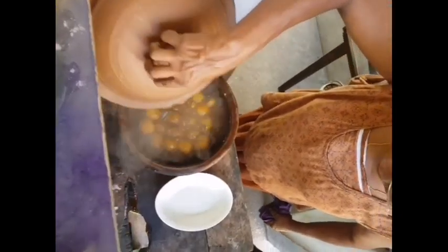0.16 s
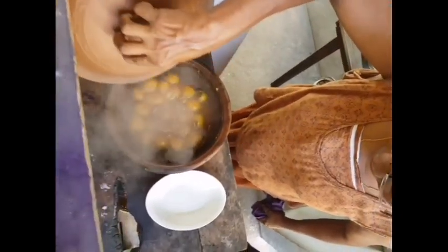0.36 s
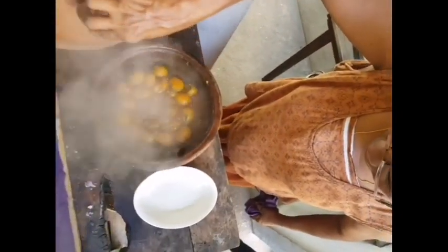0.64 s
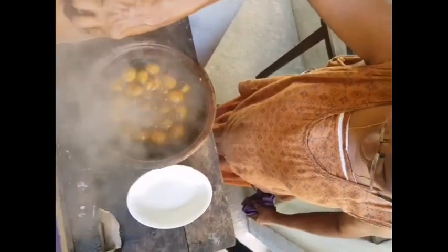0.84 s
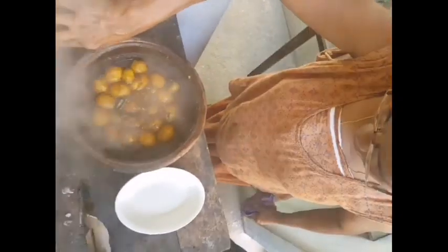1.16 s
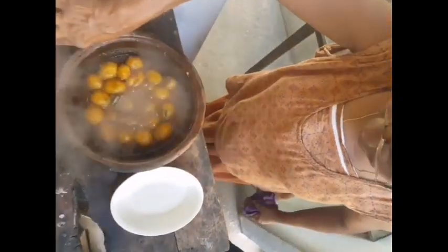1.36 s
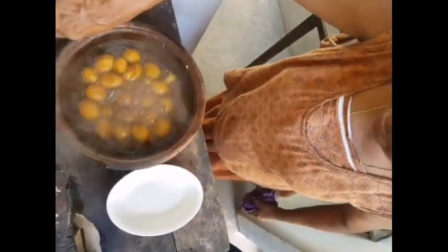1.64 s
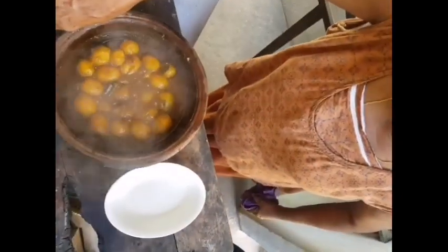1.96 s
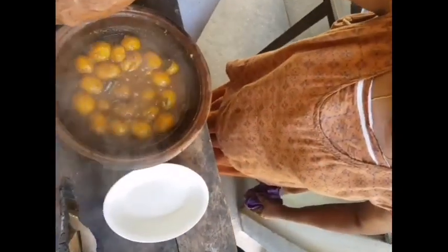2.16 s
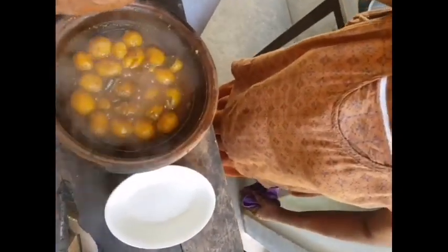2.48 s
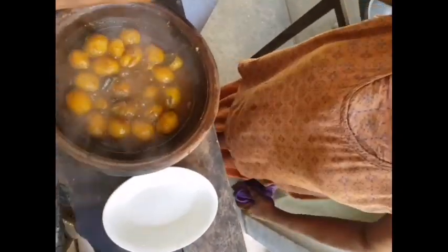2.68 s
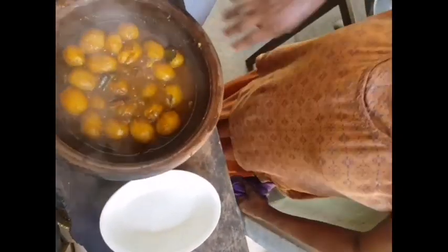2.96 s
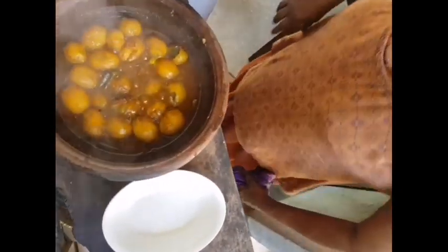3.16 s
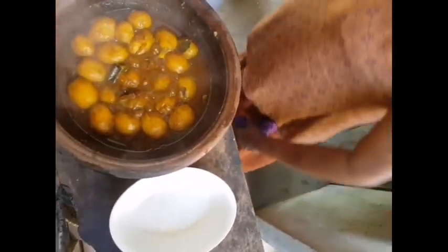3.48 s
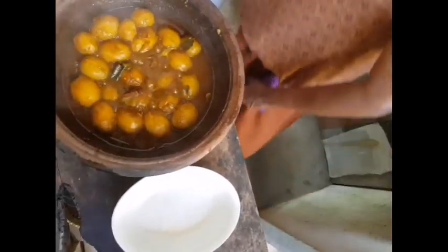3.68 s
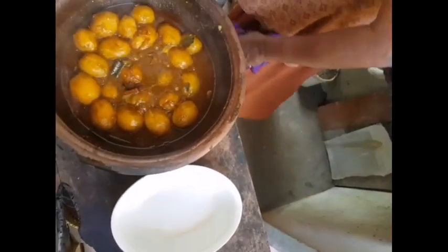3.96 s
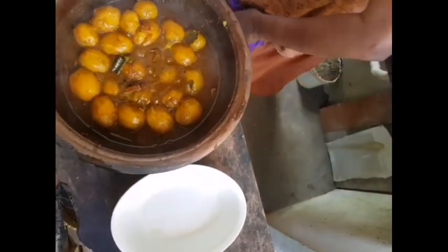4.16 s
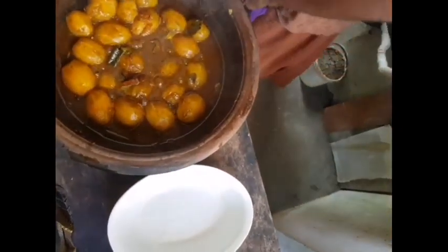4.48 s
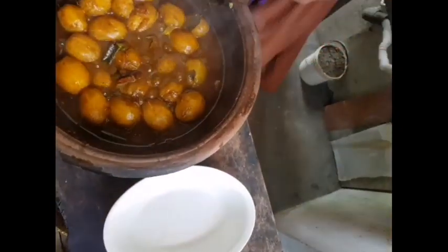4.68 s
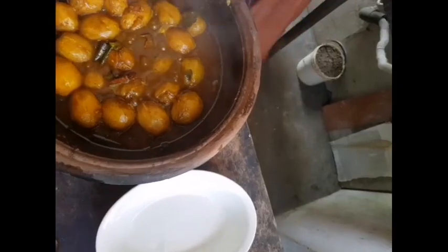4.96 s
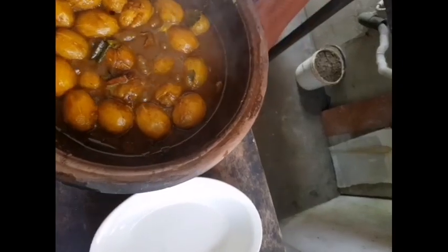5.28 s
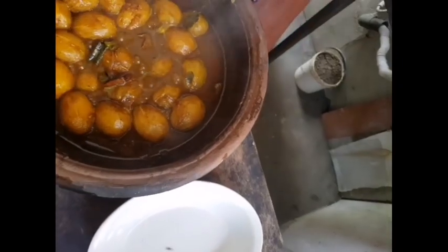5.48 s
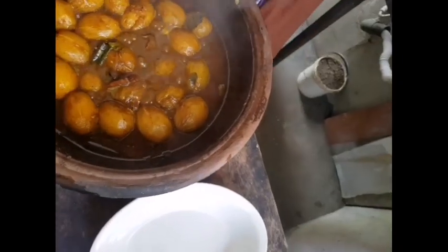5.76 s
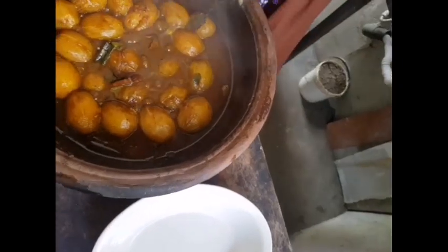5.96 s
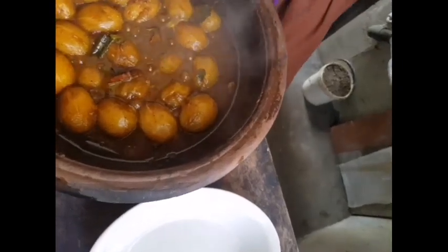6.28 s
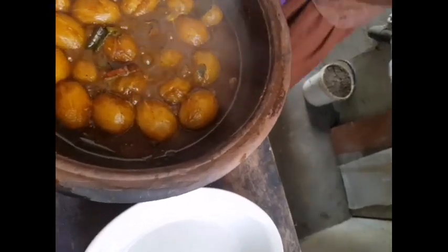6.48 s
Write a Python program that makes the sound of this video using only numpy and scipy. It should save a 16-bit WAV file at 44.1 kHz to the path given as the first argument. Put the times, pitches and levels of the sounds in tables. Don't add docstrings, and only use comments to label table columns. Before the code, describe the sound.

Close stereo in an open yard. After a quiet start with faint crackling and a fading vehicle, a clay lid bumps and scrapes on a wooden bench from about one second, ending in one loud hollow knock with a short ceramic ring. Then only soft cloth rustle, sauce spitting and bubbling toward the left, small ticks, and distant fowl, crows and a hoarse little bird over faint insects.

```python
import sys
import numpy as np
from scipy import signal
from scipy.fft import rfft, irfft
from scipy.io import wavfile
from scipy.ndimage import uniform_filter1d

SR = 44100
rng = np.random.default_rng(int(sys.argv[2]) if len(sys.argv) > 2 else 0)


def unload_wav(signal):
    wavfile.write(
        sys.argv[1],
        SR,
        np.round(np.clip(np.atleast_2d(signal).T, -1, 1) * 32767).astype(np.int16),
    )


def undo_db(level):
    steps = np.asarray(level, float) / 20
    return 10 ** steps


N = 291942

# (time [s], peak [dB], clay ring [dB], weight of the lowest modes [dB])
BUMPS = [(0.889, -23.5, -44, -28), (0.942, -24.5, -43, -32), (0.968, -26, -55, -17), (1.017, -29, -54, -30),
         (1.055, -28, -50.5, -40), (1.109, -30, -52, -32), (1.259, -27, -56, -21),
         (1.293, -12, -40.5, -10.5), (1.328, -21, -72, -12), (1.523, -21.5, -50, -4.5),
         (1.546, -23.5, -78, -13), (1.638, -22.5, -53, -4.5), (1.71, -33, -56, -1),
         (1.958, -24.5, -46, -11.5), (2.028, -21.5, -45, -15), (2.0969, -5.5, -61, -6),
         (2.0966, -29, -15.5, -10), (2.104, -31, -44, -2), (2.115, -19, -35, -17), (2.333, -28, -75, -12),
         (4.338, -56, -52, -14), (5.651, -58, -51, -4)]
# (time [s], peak [dB])
PUSHES = [
    (0.8914, -32),
    (0.9449, -27),
    (0.971, -35.5),
    (1.2984, -14),
    (1.306, -15.5),
    (1.526, -34),
    (2.0966, -10),
    (2.1062, -13),
    (2.1151, -12),
]
# (start [s], length [s], clay grind [dB], bench rumble [dB])
DRAG = [
    (0.89, 0.44, -41, -41),
    (1.382, 0.16, -45.5, -36),
    (1.572, 0.061, -46, -40),
    (1.638, 0.14, -57, -48),
    (1.864, 0.224, -42.5, -27.5),
    (2.195, 0.19, -57, -42),
    (2.362, 0.15, -79, -51.5),
]
# (frequency [Hz], level [dB], t60 [s])
BENCH_MODES = [(83, -22, 0.75), (99.7, 2.5, 0.089), (166, -1.5, 0.041), (194.6, -3.5, 0.42),
               (210, 3.5, 0.043), (233.4, 3, 0.097), (273.3, 1, 0.16), (315.2, -9, 0.23), (350.5, -3, 0.18),
               (401, -8, 0.12), (505, -21, 0.067), (595.4, -12.5, 0.17)]
# (frequency [Hz], level [dB], t60 [s])
CLAY_MODES = [(520, -22, 0.17), (640, -28, 0.13), (710, -17, 0.15), (824, -18, 0.36), (900, -17, 0.34),
              (1060, -31, 0.28), (1130, -5, 0.12), (1261, 2.5, 0.057), (1300, -11, .25), (1480, -16, 0.11),
              (1523, -4, 0.15), (1620, -8, 0.21), (1900, -6, 0.124), (2410, -17, 0.15), (2520, -11, 0.13),
              (2760, -17, 0.07), (3050, -19, 0.078)]
# (frequency [Hz], width [Hz], level [dB])
RIM_MODES = [(1027, 20, -4), (1300, 55, -11), (1493, 100, 5.5), (1687, 20, -2.5), (1940, 53, -19),
             (2340, 17, 4), (2494, 43, -3), (3740, 55, -11), (3050, 27, -0.5), (3820, 40, 1),
             (4220, 95, -8.5)]
# (time [s], tilt [dB per octave])
GRIND_TILT = [(0.85, 2), (1.1, -3), (1.3, 0), (1.8, -1.5), (2.1, 12), (2.3, -9)]

# (peak time [s], peak [dB], rise [s], fall [s])
RUSTLE_MOVES = [(.07, -68.5, 0.017, 0.58), (.55, -61.5, 0.13, 0.19), (.74, -59, 0.1, 0.073),
                (1.01, -57, 0.18, 1), (1.27, -50, 0.2, 0.14), (1.55, -53.5, 0.18, 0.054),
                (1.788, -48.5, 0.31, 0.1), (1.95, -47, 0.092, 0.37), (2.031, -36.5, 0.029, 0.14),
                (2.079, -43, 0.068, 0.02), (2.358, -51.5, 0.049, 0.042), (2.51, -53.5, 0.18, 0.098),
                (2.879, -55.5, 0.02, 0.15), (3.41, -58, 0.1, 0.26), (3.6, -59.5, 0.12, 0.075),
                (3.909, -62, 0.044, 0.16), (4.07, -54, 0.017, 0.15), (4.35, -47.5, 0.03, 0.065),
                (4.38, -54.5, 0.015, 0.72), (4.53, -58, 0.8, 0.067), (4.755, -64, 0.018, 0.025),
                (5.38, -63.5, 0.034, 0.13), (5.53, -56.5, 0.049, 0.093), (5.84, -63, 0.21, 0.15),
                (6.03, -62.5, 0.13, 0.15), (6.19, -57.5, 0.022, 0.065), (6.32, -56, 0.0052, 0.087),
                (6.401, -53, 0.026, 0.079), (6.44, -68, .02, 0.066), (6.58, -53, 0.025, 0.072)]
# (frequency [Hz], density [dB per Hz])
RUSTLE_TONE = [(900, -27), (1800, -3), (2900, 0.5), (4600, 5.5), (7000, -3.5), (8800, -6.5), (11000, -1.5),
               (14000, -8), (16000, -17.5)]
# (time [s], level [dB])
WEIGHT = [(0, 3.5), (.5, -5), (.86, -4.5), (1.0, 2), (1.6, 3), (1.78, -7.5), (1.9, 2.5), (2.1, 7.5),
          (2.5, -1.5), (3.9, 1.5), (4.4, 1.5), (5.3, -2), (5.65, 2.5), (6.2, -6), (6.4, 0), (6.62, 2.5)]

# (time [s], peak [dB], pitch [Hz], t60 [s], left over right [dB])
TICKS = [
    (4.095, -40, 2140, 0.014, 5),
    (3.194, -39, 980, 0.023, 9),
    (4.3453, -39.5, 4560, 0.12, -10),
    (5.528, -64, 2860, 0.026, 6),
    (5.833, -44.5, 8800, 0.014, 10),
    (6.392, -43, 10100, 0.014, 15),
    (6.562, -33, 2340, 0.027, 9),
    (6.572, -44.5, 2606, 0.045, 11),
]
# (time [s], peak [dB], centre [Hz], t60 [s])
CRACKS = [(1.297, -32.5, 2926, 0.12), (5.52, -59, 1900, 0.45), (5.545, -54.5, 1470, .25),
          (5.549, -57, 2750, .2), (5.168, -59, 990, .08), (5.407, -56, 1000, .08),
          (5.435, -55.5, 1040, 0.07), (6.39, -46, 14500, .15), (2.49, -49, 12500, .3),
          (3.108, -58, 1200, 0.051), (3.59, -49, 1500, 0.064), (5.655, -49, 3700, 0.24),
          (6.4, -58, 1300, 0.11)]

# (time [s], peak [dB], left over right [dB])
SPITS = [(0.1381, -44, 5.0), (0.5432, -42, -1), (0.7018, -42.5, 6), (0.7297, -42, 2.5), (0.84, -45.5, 10),
         (0.8934, -41, 5.5), (0.9448, -46, 3.5), (1.1817, -49, -1), (1.418, -44.5, 8), (1.5355, -40.5, 8),
         (1.677, -39.5, 11), (1.903, -40, 9), (1.948, -40, 6.0), (2.0313, -28.5, 10), (2.2089, -55, 6),
         (2.3436, -48, 12), (2.7576, -51, 4.0), (2.768, -47, 6), (2.8688, -52, 8), (3.0897, -47, 6.0),
         (3.2171, -50, 2.0), (3.23, -45, 5.0), (3.2894, -51, 7.5), (3.4695, -46, 10), (3.639, -48, 7),
         (3.688, -46, 4.5), (3.7796, -66, 3.5), (3.8908, -48, 8), (4.0682, -51, 5.0), (4.1894, -50, 6.0),
         (4.3455, -45, 2.5), (4.5156, -54, 4.0), (4.75, -47, 13), (4.8479, -53, 9), (4.916, -46, 12),
         (5.0419, -62, 8.0), (5.0415, -49, 9.5), (5.0557, -45.5, 9), (5.1313, -51, 11), (5.164, -47, 13),
         (5.237, -50, 7), (5.2759, -46, 13), (5.3373, -58, 8.0), (5.3742, -45.5, 19), (5.4774, -51, 10),
         (5.5308, -45, 5.5), (5.5867, -50, 3.0), (5.7074, -51, 7.0), (5.7726, -49, 12), (5.831, -37.5, 13),
         (5.9104, -47, 13), (5.9539, -48, 11), (6.017, -38, 13.5), (6.097, -51, 3.5), (6.1865, -47, 17),
         (6.3213, -45, 5), (6.392, -35.5, 14), (6.4923, -50.5, 10), (6.558, -62, 10), (6.572, -37, 9)]
# (time [s], peak [dB], pitch [Hz])
BUBBLES = [(3.579, -54, 695), (3.611, -50, 640), (4.236, -59, 1143), (4.284, -60, 567), (4.402, -48, 620),
           (4.452, -50, 440), (4.592, -51, 1050), (4.628, -50.5, 1100), (4.689, -64, 1340),
           (5.049, -53, 540), (5.17, -49, 910), (5.188, -68, 930), (5.418, -51, 600), (5.444, -64, 570),
           (5.662, -46, 725)]

# (time [s], pitch [Hz], level [dB])
FOWL = [
    [(2.42, 551, -58.5), (2.49, 665, -49), (2.54, 697, -42.5), (2.575, 682.5, -47.5), (2.63, 690.8, -45.5),
     (2.68, 692.3, -45), (2.73, 689, -67), (2.8, 703, -56)],
    [(3.0, 566, -52), (3.04, 588.3, -61), (3.06, 674.4, -52), (3.09, 683, -53.5), (3.116, 664.5, -45),
     (3.19, 656.4, -45), (3.25, 662, -57), (3.4, 652, -65.5), (3.78, 652.3, -64)],
    [(5.88, 549.7, -71), (5.91, 619, -53.5), (5.945, 640, -53), (5.965, 668.6, -45.5), (6.04, 650.2, -47.5),
     (6.08, 660, -47), (6.2, 637, -57.5), (6.25, 640, -59.5), (6.4, 652, -63)],
]
FOWL_OVERTONES_DB = [-13, -10.5, -8]
# (time [s], pitch [Hz], level [dB])
CLUCK = [(5.648, 691, -53), (5.658, 695, -51.5), (5.685, 692.5, -55), (5.7, 681, -63), (5.76, 668, -75)]
# (multiple of the pitch, level [dB])
CLUCK_PARTIALS = [(1, -1.5), (1.85, -3.5), (2.85, 1.5), (4, -3), (4.95, -5)]
# (start [s], length [s], pitch
# [Hz], level [dB])
FAR_FOWL = [
    (0.496, 0.43, 1312, -67),
    (5.3, 0.197, 578.4, -65),
]
# (start [s], length [s], pitch [Hz], level [dB], fall of pitch [0-1])
CROWS = [
    (0.332, 0.22, 1838, -60.5, 0.04),
    (3.752, 0.37, 2007, -56, 0.19),
    (4.689, 0.28, 2150, -66, 0.22),
    (0.329, 0.18, 1326, -66, .03),
    (3.749, .36, 1390, -67, .1),
    (4.685, 0.25, 1523, -70, 0),
]
# (start [s], length [s], centre [Hz], level [dB], trill [Hz])
CHIRPS = [
    (1.706, 0.15, 2804, -57.5, 300.5),
    (5.312, 0.166, 2830, -60.5, 299),
    (5.591, 0.27, 2335, -59, 220.7),
]
CHIRP_LINES_DB = [-5.5, 0, -2, -4]
FAR_FOWL_SHAPE = dict(attack_s=0.027, release_s=0.064, onset_db=-9, hold_db=4, end_db=-11, scoop_s=0.024, scoop=0.011, sag=0.0313)
CROW_SHAPE = dict(attack_s=0.025, release_s=0.081, onset_db=-8, hold_db=3, end_db=-9, scoop_s=0.073, scoop=0.0497)
CHIRP_SHAPE = dict(attack_s=0.042, release_s=0.19, onset_db=-5.5, hold_db=0.3, end_db=-14.5, scoop_s=0.0343, scoop=0.0397, sag=0.052)

# (frequency [Hz], width [Hz], pulses [per s], level [dB])
INSECTS = [
    (5370, 490, 21, -83),
    (4026, 150, 53, -71),
]
# (frequency [Hz], density [dB per Hz])
AIR = [(15, 3.5), (25, 0), (134, 5.5), (344, -9), (1070, -8), (2480, -25), (3430, -20), (4030, -7),
       (5000, -14.5), (5570, -1.5), (7110, -31), (8830, -42), (12500, -29), (14800, -24), (16000, -51)]
# (time [s], swell [dB])
MURMUR = [(0, 7), (.3, 0), (.7, 3.5), (1.5, 9.5), (2.6, 6.5), (3.6, 4.5), (4.4, 6), (4.9, 0), (5.4, 5.5),
          (6, 3), (6.62, 3.5)]
# (frequency [Hz], likeness [0-1])
LIKENESS = [(60, 0.94), (180, 0.86), (550, 0.38), (1650, 0.21), (5000, 0.3), (15000, .01)]
# (frequency [Hz], level [dB])
MICROPHONE = [(100, 0.5), (6300, -1), (7300, -3.5), (8100, 1.5), (8800, 5), (10500, -1.5), (15300, -7.5),
              (15750, -7), (15950, -59), (22000, -60)]

DRAG_SWELL_DB, GRIND_SWELL_DB, DRAG_STOP_DB_PER_S = 23.5, 6.5, 286
ROCK_DB, ROCK_FADE_DB_PER_S = -10, 159
CLAY_DELAY = round(.005 * SR)
RIM_WANDER_DB = 4.5
RUSTLE_REST_DB, REST_WANDER_DB = -69.5, 1.8
RUSTLE_EDGE_DB = 25
BODY_DB, TOP_DB = 0.5, 4
SMALL_SPITS_PER_S, SMALL_SPIT_DB = 8, -68
RIM_CLICK_DB, RIM_CLICK_TOP_DB = -4, -51
EFFORT_BRIGHTENS, THIRD_DB = 0.29, -9
AIR_DB, TRAFFIC_DB, TRAFFIC_FADE_S, LOWS_FOLLOW = -59.5, 13, 0.52, 0.23


def lid():
    rumble_gain, grind_gain = dragging()
    bench = bench_thuds() + rumble_gain * undo_db(-3.5) * bench_rumble()
    bench = band(band(bench, 65, 1500), 65, 3000)
    clay = clay_ring() + clay_clatter() + grind_gain * rim_grind()
    left, right = pan(yard(bench, 0.2, wet_db=-14.5), left_db=2.5) + yard(clay, 0.067, wet_db=1.0)
    return np.array([left, np.roll(right, 14)])


def bench_thuds():
    thud = np.zeros(N)
    s, peak_db, _, low_weight_db = np.transpose(BUMPS)
    for k, (hz, level_db, t60) in enumerate(BENCH_MODES):
        weight_db = low_weight_db + 12.7 if hz < 130 else 0
        blow_db = peak_db + level_db + weight_db - 15.0 + rng.normal(0, 3.3, len(s))
        thud += (-1) ** (k + 1) * ring(strikes(samples(s), blow_db, np.ones(1)), hz, t60)
    s, peak_db = np.transpose(PUSHES)
    return thud - ring(strikes(samples(s), peak_db + 0.5, np.ones(1)), hz=269, t60=0.034)


def bench_rumble():
    rocking = grains(260, spread_db=5.0, channels=2)
    rumble = np.zeros(N)
    for k, (hz, level_db, t60) in enumerate(BENCH_MODES):
        off_centre_db = abs(np.log2(hz / 210)) * 6.4
        rumble += undo_db(level_db - off_centre_db) * ring(rocking[k % 2], hz, 0.77 * t60)
    return rumble / np.sqrt(uniform_filter1d(rumble ** 2, size=3000) + 1e-9)


def clay_ring():
    clay, settle = np.zeros(N), np.arange(round(.08 * SR)) / SR
    s, _, ring_db, _ = np.transpose(BUMPS)
    for hz, level_db, t60 in CLAY_MODES:
        contact = rng.standard_normal(len(settle)) * undo_db(-28.5 - 60 * settle / 0.066)
        contact[0] = 0.64
        blow_db = ring_db + level_db - 4.5 + rng.normal(0, 2.0, len(s))
        clay += ring(strikes(samples(s) + CLAY_DELAY, blow_db, contact), hz, np.clip(t60, .02, .35))
    return clay


def clay_clatter():
    t = np.arange(4 * round(.08 * SR)) / SR
    s, _, ring_db, _ = np.transpose(BUMPS)
    clatter = rng.standard_normal(len(t)) * undo_db(-60 * t / 0.28)
    clatter = strikes(samples(s) + CLAY_DELAY, ring_db + 8.8, clatter)
    return band(band(clatter, 720, 1670), 390, 2450)


def rim_grind():
    rough, tilt_db = grains(1500, spread_db=3.5)[0], in_time(GRIND_TILT)[1]
    grind = np.zeros(N)
    for hz, width_hz, level_db in RIM_MODES:
        wander_db = RIM_WANDER_DB * drift(13.6)
        pressed_db = np.log2(hz / 2000) * tilt_db
        grind += undo_db(level_db + wander_db + pressed_db) * rms_one(ring(rough, hz, 4.2 / width_hz))
    dull = .75 * undo_db(-tilt_db) * rms_one(band(rough, 1000, 1800))
    return undo_db(-5.0) * rms_one(rms_one(grind) + dull)


def dragging():
    rumble, grind, t = np.zeros(N), np.zeros(N), np.arange(N) / SR
    for s, length, grind_db, rumble_db in DRAG:
        push = (t > s) * undo_db(peaked(s + length, 1 / length, 0))
        stop = undo_db(peaked(s + length, 0, DRAG_STOP_DB_PER_S))
        rumble += undo_db(rumble_db) * stop * push ** DRAG_SWELL_DB
        grind += undo_db(grind_db) * stop * push ** GRIND_SWELL_DB
    for s, peak_db, *_ in BUMPS:
        rock_db = peak_db + ROCK_DB + peaked(s + 0.0097, 1400, ROCK_FADE_DB_PER_S)
        rumble = np.maximum(rumble, undo_db(rock_db))
    return rumble, grind


def rustle():
    moves = np.zeros(N)
    for s, peak_db, rise_s, fall_s in RUSTLE_MOVES:
        move_db = peak_db + peaked(s, RUSTLE_EDGE_DB / rise_s, RUSTLE_EDGE_DB / fall_s)
        moves = np.maximum(moves, undo_db(move_db))
    fibres = grains(3500 * undo_db(3.5 * drift(30)), spread_db=1.5, channels=2)
    fibres = coloured(fibres, RUSTLE_TONE)
    weight_db = in_time(WEIGHT)[1]
    bright = band(fibres, 6110, 13080)
    body = undo_db(BODY_DB + weight_db) * band(fibres, 1230, 3400)
    edge = undo_db(TOP_DB - 0.35 * weight_db) * band(fibres, 11280, 18700)
    rest = undo_db(RUSTLE_REST_DB + REST_WANDER_DB * drift(6.7))
    level = pan(moves, left_db=1) + pan(rest, left_db=3)
    return level * (bright + body + edge) / np.std(bright)


def ticks():
    out, t = np.zeros((2, N)), np.arange(int(.12 * SR)) / SR
    for s, peak_db, hz, t60, left_db in TICKS:
        draw = rng.standard_normal((2, len(t)))
        modes = 0
        for ratio, share in [(1, 0.57), (1.2, 0.17), (1.27, 0.13)]:
            modes = modes + share * np.sin(2 * np.pi * hz * ratio * t)
        puff = .5 * band(draw, 0.072 * hz, 1.5 * hz)
        crack = 0.12 * draw * undo_db(-60 * t / 0.011)
        hit = (modes + puff + crack) * undo_db(-60 * t / np.clip(t60, .005, .2))
        place(out, s, pan(undo_db(peak_db) * hit, left_db))
    return out


def cracks():
    out, t = np.zeros((2, N)), np.arange(round(.15 * SR)) / SR
    for s, peak_db, hz, t60 in CRACKS:
        burst = rms_one(band(rng.standard_normal((2, len(t))), 0.72 * hz, 1.44 * hz))
        place(out, s, undo_db(peak_db - 60 * t / t60) * burst)
    return out


def sauce():
    out, t = np.zeros((2, N)), np.arange(round(0.11 * SR)) / SR
    draws = rng.random((round(SMALL_SPITS_PER_S * 6.4), 2))
    small = [(6.4 * s, SMALL_SPIT_DB + 8.0 * size, 6) for s, size in draws]
    rim = [(s + 0.0023, min(clay_db + RIM_CLICK_DB, RIM_CLICK_TOP_DB), 3) for s, _, clay_db, _ in BUMPS]
    for s, peak_db, left_db in SPITS + small + rim:
        noise = rng.standard_normal((2, len(t))) + 0.47 * rng.standard_normal(len(t))
        crack = band(noise * undo_db(-60 * t / 0.016), 5400, 13800)
        place(out, s, pan(undo_db(peak_db - 2.5) * crack, left_db))
    return out + undo_db(3.5) * yard(bubbles(), .1, wet_db=0.0)


def bubbles():
    pops, t = np.zeros((1, N)), np.arange(round(0.11 * SR)) / SR
    for s, peak_db, hz in BUBBLES:
        pop = np.sin(2 * np.pi * hz * t * (.92 + 25.0 * t))
        place(pops, s, undo_db(peak_db - 60 * t * hz / 17.0) * pop[None])
    return pops[0]


def birds():
    low = fowl() + far_fowl()
    high = crows() + chirps() + cluck()
    return undo_db(-0.5) * yard(low, 0.85, wet_db=3.5) + undo_db(0.5) * yard(high, 0.62, wet_db=-1.0)


def fowl():
    out = np.zeros(N)
    breath = rms_one(band(rng.standard_normal(N), 500, 1750))
    for rows, overtones_db in zip(FOWL, FOWL_OVERTONES_DB):
        gate, hz, one_db = in_time(rows)
        two_db = one_db + overtones_db + EFFORT_BRIGHTENS * (one_db - one_db.max())
        overtones = [(2, two_db), (3, two_db + THIRD_DB), (4, two_db + 2 * THIRD_DB)]
        out += voice(gate, hz, [(1, one_db)], rough=.33, flutter_hz=60, jitter=.008)
        out += voice(gate, hz, overtones, rough=.45, flutter_hz=60, jitter=.007)
        out += gate * undo_db(one_db - 12.0) * breath
    return out


def far_fowl():
    out = np.zeros(N)
    for row in FAR_FOWL:
        gate, hz, level_db = call(*row, **FAR_FOWL_SHAPE)
        partials = [(0.94, level_db), (0.13, level_db - 14)]
        out += voice(gate, hz, partials, rough=0.88, flutter_hz=42.4, jitter=0.011)
    return out


def crows():
    out = np.zeros(N)
    for (*row, fall), rough in zip(CROWS, (.97, .8, .75) * 2):
        gate, hz, level_db = call(*row, sag=fall, **CROW_SHAPE)
        out += voice(gate, hz, [(1, level_db)], rough, flutter_hz=60 + 200 * rough ** 4, jitter=.007)
    return out


def chirps():
    out = np.zeros(N)
    for *row, trill_hz in CHIRPS:
        gate, hz, level_db = call(*row, **CHIRP_SHAPE)
        lines = [(1 + (k - 1) * trill_hz / row[2], level_db + line_db)
                 for k, line_db in enumerate(CHIRP_LINES_DB)]
        out += voice(gate, hz, lines, rough=.85, flutter_hz=100, jitter=.012)
    return out


def cluck():
    gate, hz, level_db = in_time(CLUCK)
    partials = [(k, level_db + part_db) for k, part_db in CLUCK_PARTIALS]
    return voice(gate, hz, partials, rough=.6, flutter_hz=90, jitter=.015)


def insects():
    out, t = 0, np.arange(N) / SR
    for hz, width_hz, per_s, level_db in INSECTS:
        throb = 1 + .55 * np.cos(2 * np.pi * per_s * t) + .35 * np.cos(4 * np.pi * per_s * t)
        hiss = band(rng.standard_normal((2, N)), hz - width_hz / 2, hz + width_hz / 2)
        out = out + undo_db(level_db + 3.2 * drift(3.0)) * rms_one(hiss * throb)
    return out


def air():
    middle_db = in_time(MURMUR)[1]
    traffic_db = TRAFFIC_DB * np.exp(-np.arange(N) / SR / TRAFFIC_FADE_S)
    low_db = traffic_db + LOWS_FOLLOW * middle_db
    out, edges = 0, 25 * 2 ** np.arange(0, 9.6, 2 / 3)
    white = coloured(rng.standard_normal((2, 2, N)), AIR)
    white = white / np.std(white)
    for k, (low, high) in enumerate(zip(edges, edges[1:])):
        mid, side = band(white[k % 2], low, high)
        alike = np.clip(at_hz(LIKENESS, np.sqrt(low * high)), 0, .99)
        swell_db = low_db if high < 260 else middle_db if high < 1300 else 0
        gain = undo_db(AIR_DB + swell_db + 1.14 * drift(4.7))
        out = out + gain * (mid + np.sqrt((1 - alike) / (1 + alike)) * side * [[1], [-1]])
    return out


def voice(gate, hz, partials, rough, flutter_hz, jitter):
    on, out = gate > 0, np.zeros(N)
    wavering_hz = hz[on] * (1 + jitter * drift(28.8, count=on.sum()))
    phase = 2 * np.pi * np.cumsum(wavering_hz) / SR
    share = np.clip(rough, 0, 1)
    for k, level_db in partials:
        uneven = np.sqrt(1 - share) + np.sqrt(share) * drift(flutter_hz, count=on.sum())
        out[on] += np.sqrt(2) * undo_db(level_db[on]) * np.sin(k * phase) * uneven
    return gate * out


def call(s, length, hz, level_db, attack_s, release_s, onset_db, hold_db, end_db, scoop_s, scoop, sag):
    hold_s = s + max(length - release_s, attack_s)
    effort = [(s, onset_db), (s + attack_s, 0), (hold_s, hold_db), (s + length, end_db)]
    gate, effort_db = in_time(effort)
    pitch = in_time([(s, 1 - scoop), (s + scoop_s, 1), (s + length, 1 - sag)])[1]
    return gate, hz * pitch, level_db + effort_db


def ring(clicks, hz, t60):
    r, w = undo_db(-60 / (t60 * SR)), 2 * np.pi * hz / SR
    return signal.lfilter([0, np.sin(w)], [1, -2 * r * np.cos(w), r * r], clicks + 1e-18)


def strikes(at, level_db, contact):
    force = np.zeros(N)
    for i, gain in zip(at, undo_db(level_db)):
        force[i:i + len(contact)] += gain * contact
    return force


def grains(per_s, spread_db, channels=1):
    shape = (channels, N)
    sizes = undo_db(spread_db * np.minimum(rng.exponential(1, shape), 4)) * rng.choice([-1, 1], shape)
    return sizes * (rng.random(shape) < per_s / SR)


def yard(x, t60, wet_db):
    t = np.arange(SR) / SR
    tail = rng.standard_normal((2, len(t))) * undo_db(-60 * t / t60)
    tail = tail / np.sqrt(np.sum(tail ** 2, axis=1, keepdims=True))
    return x + undo_db(wet_db) * signal.fftconvolve(x[None], tail, axes=1)[:, :N]


def pan(x, left_db):
    return x * undo_db(np.array([left_db / 2, -left_db / 2])).reshape(2, -1)


def place(out, s, burst):
    i = round(s * SR)
    out[:, i:i + burst.shape[1]] += burst[:, :N - i]


def samples(s):
    return np.round(s * SR).astype(int)


def peaked(s, rise_db_per_s, fall_db_per_s):
    t = np.arange(N) / SR - s
    return np.where(t < 0, rise_db_per_s * t, -fall_db_per_s * t)


def in_time(rows):
    s, *columns = np.transpose(rows)
    t = np.arange(N) / SR
    gate = np.clip(np.minimum(t - s[0], s[-1] - t) / 0.01, 0, 1)
    return [gate] + [np.interp(t, s, c) for c in columns]


def drift(rate_hz, count=N):
    r = np.exp(-2 * np.pi * rate_hz / SR)
    white = rng.standard_normal(count + 9000)
    return rms_one(signal.lfilter([1], [1, -2 * r, r * r], white)[9000:])


def band(x, low_hz, high_hz):
    edges = [low_hz, min(high_hz, .45 * SR)]
    return signal.sosfilt(signal.butter(2, edges, "band", fs=SR, output="sos"), x)


def at_hz(points, hz):
    point_hz, db = np.transpose(points)
    return np.interp(np.log(hz), np.log(np.maximum(point_hz, 1)), db)


def coloured(x, spectrum):
    hz = np.maximum(np.fft.rfftfreq(N, 1 / SR), 10)
    return irfft(rfft(x) * undo_db(at_hz(spectrum, hz)), N)


def rms_one(x):
    return x / np.sqrt(np.mean(x ** 2) + 1e-20)


def scene():
    return lid() + rustle() + ticks() + cracks() + sauce() + birds() + insects() + air()


def roll_off(x):
    return signal.sosfilt(signal.butter(12, 16480, fs=SR, output="sos"), x)


def record(dry):
    heard = coloured(dry, MICROPHONE)
    return roll_off(heard)


dry = scene()
out = record(dry)
unload_wav(out)
```